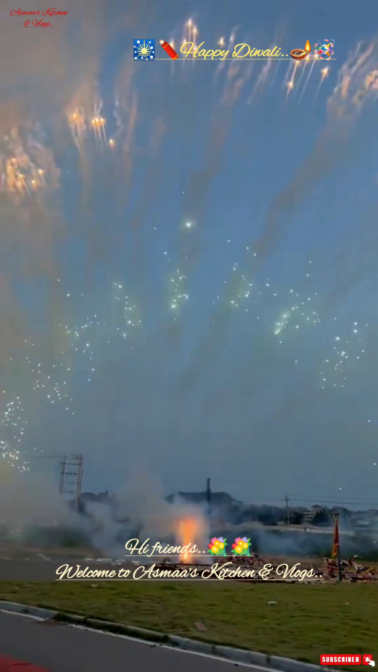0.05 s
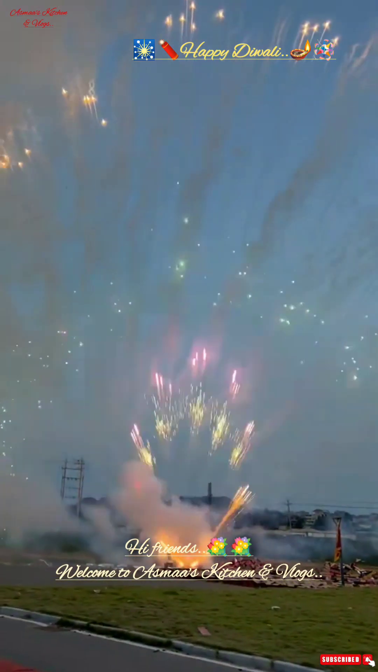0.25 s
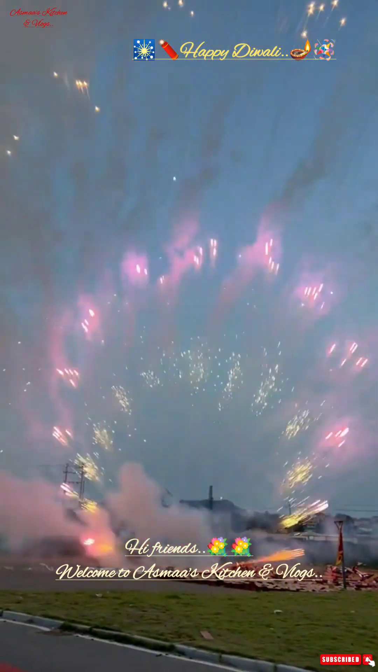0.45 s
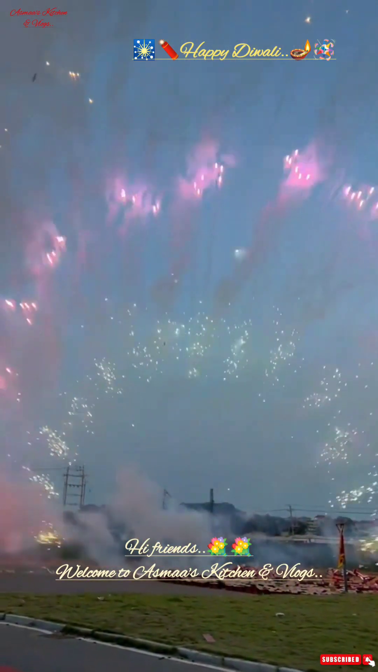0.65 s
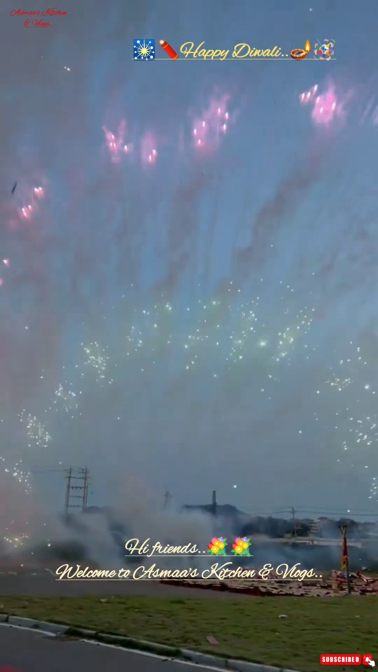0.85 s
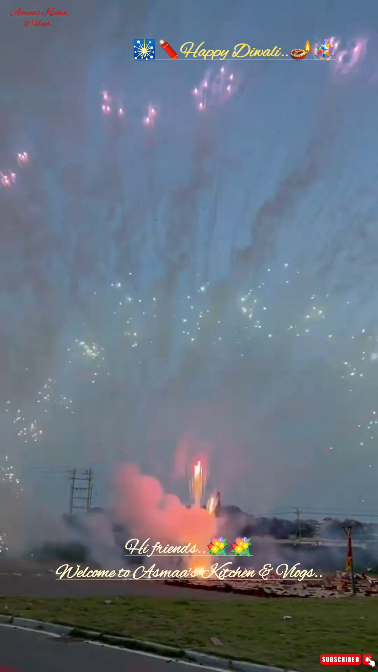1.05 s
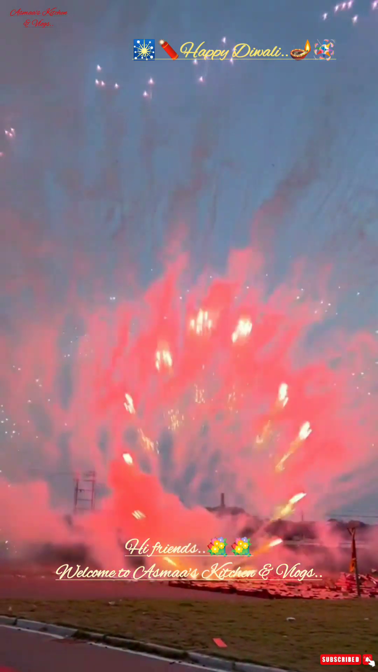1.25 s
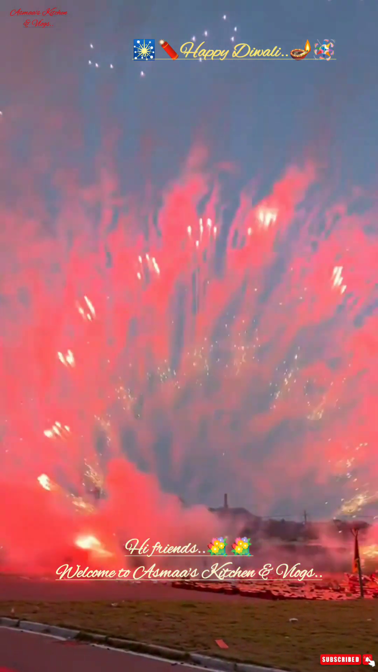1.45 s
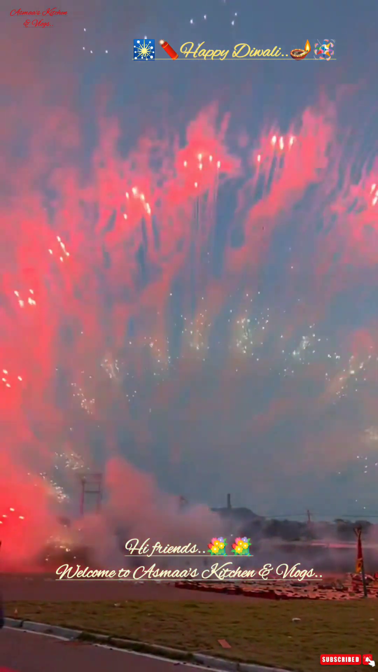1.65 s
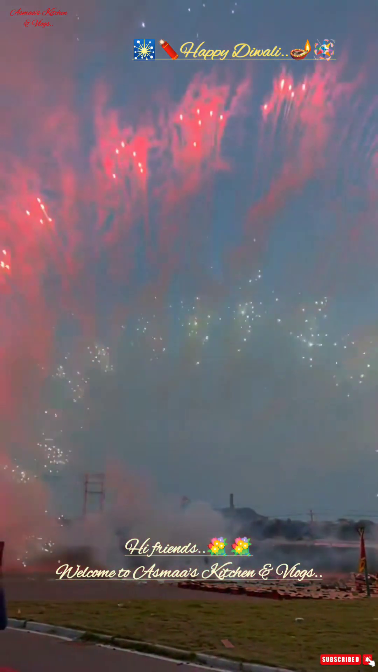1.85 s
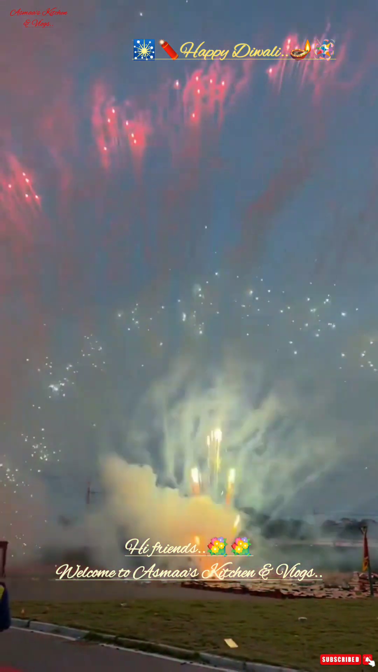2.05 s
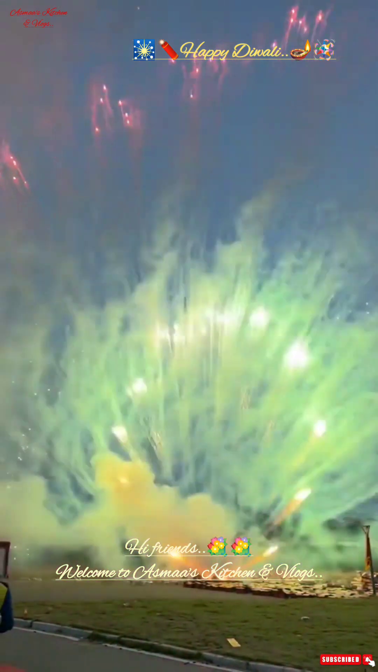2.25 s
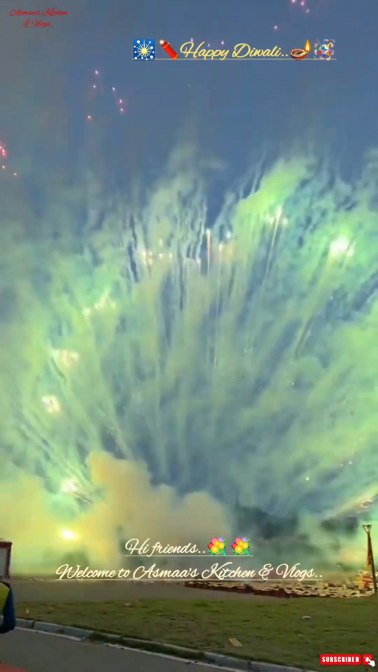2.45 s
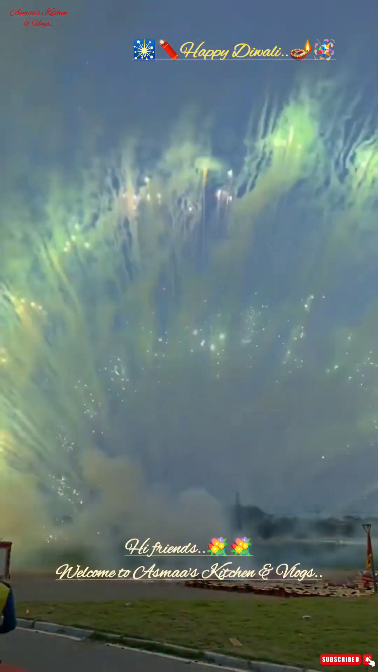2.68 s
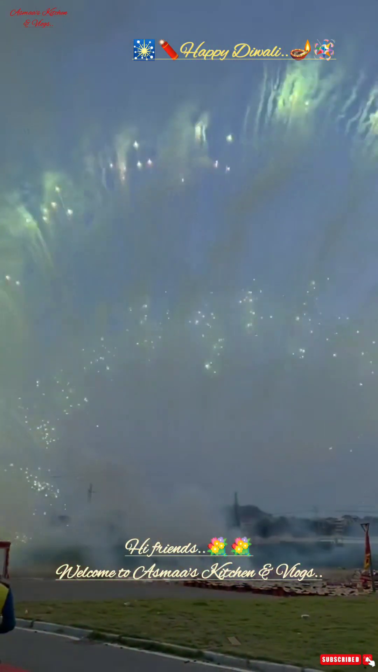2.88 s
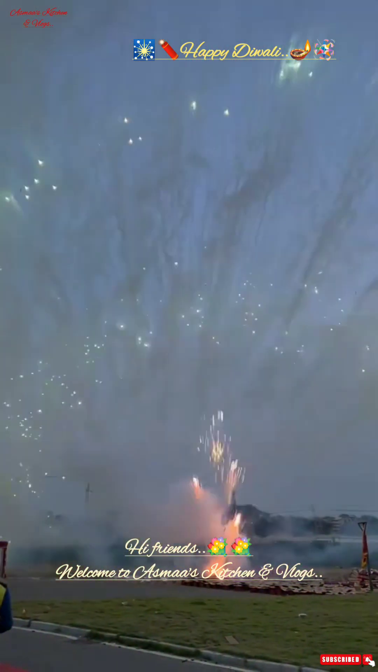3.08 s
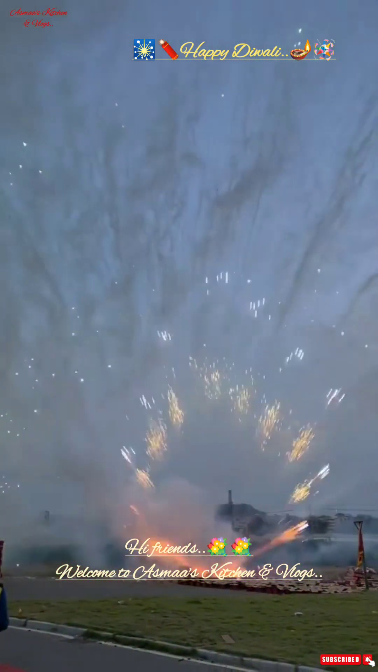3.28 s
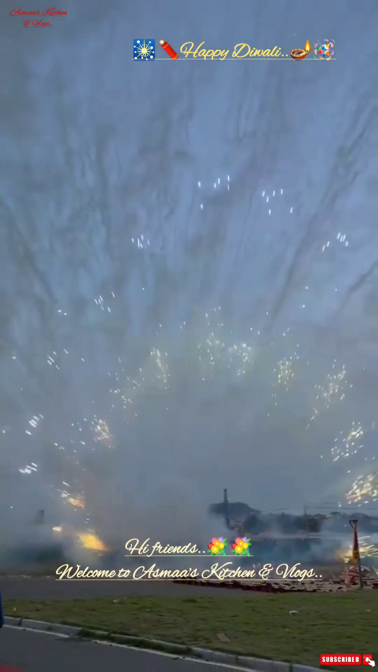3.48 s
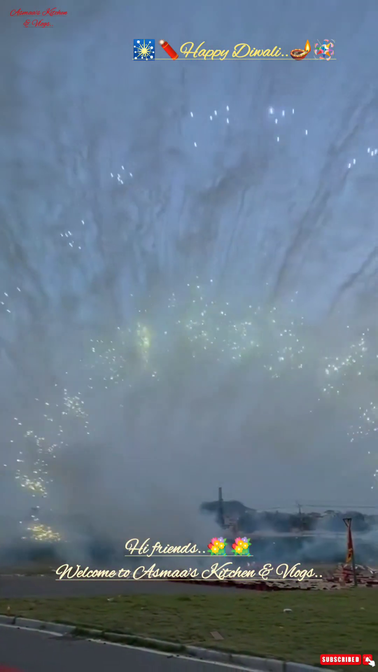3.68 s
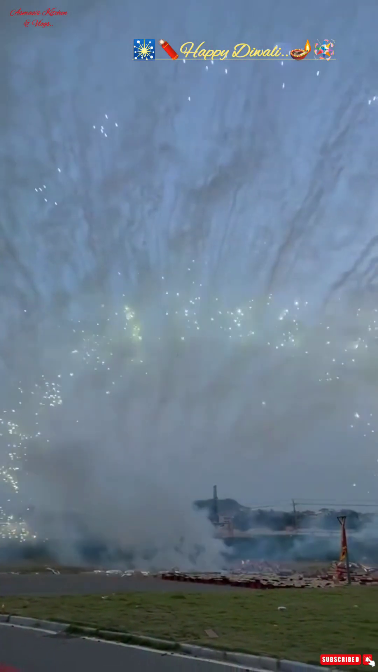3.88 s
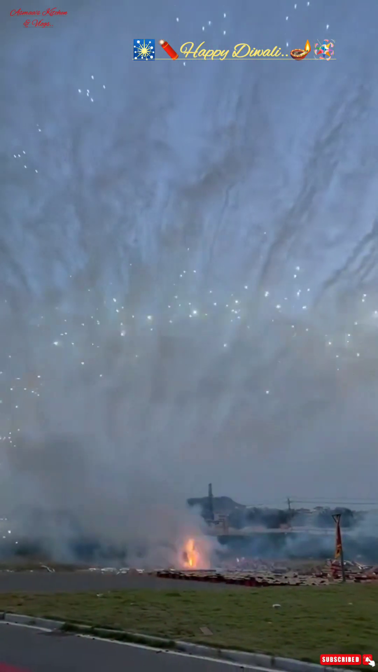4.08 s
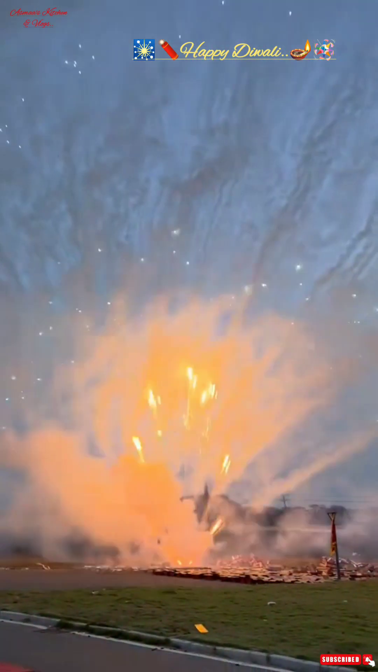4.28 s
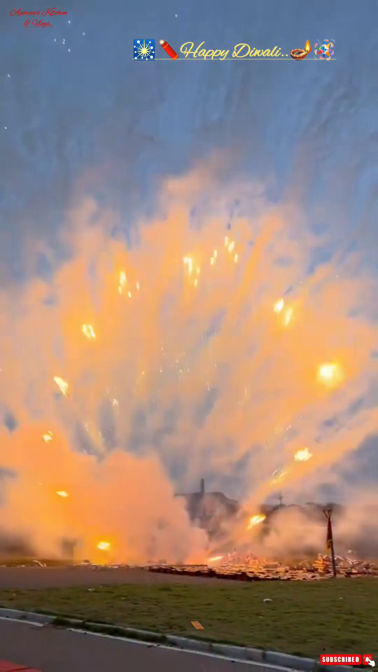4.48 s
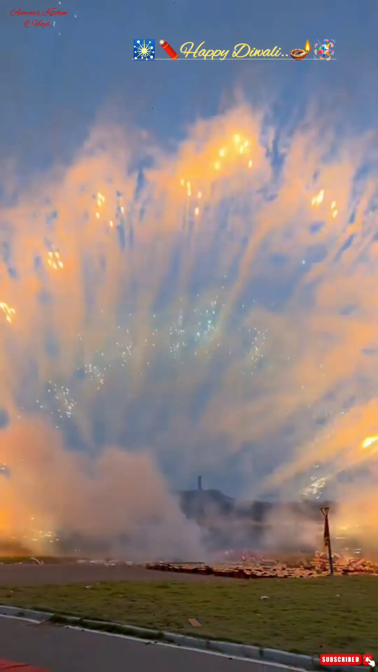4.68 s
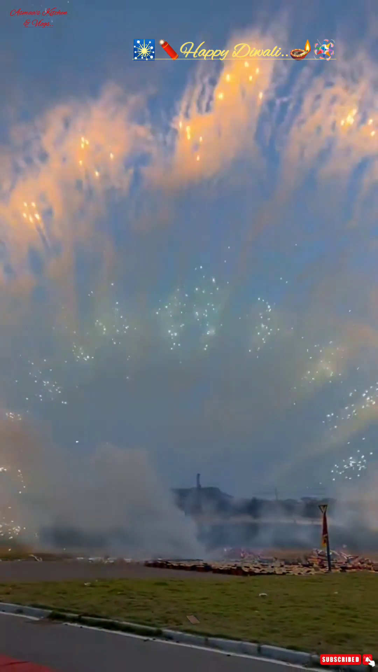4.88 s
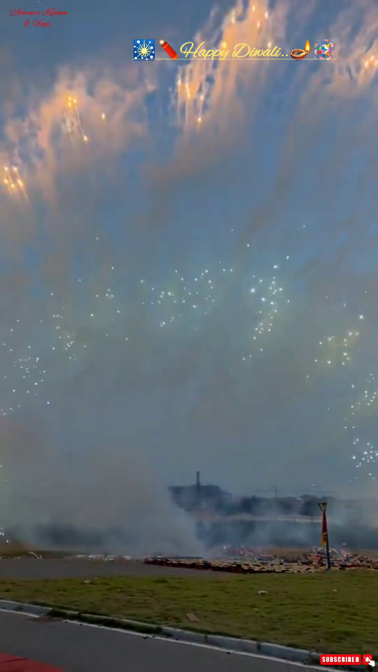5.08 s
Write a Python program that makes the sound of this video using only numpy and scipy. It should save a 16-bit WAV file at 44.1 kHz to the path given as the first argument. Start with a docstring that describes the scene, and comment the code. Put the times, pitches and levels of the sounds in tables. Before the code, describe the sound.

Five rapid volleys of fireworks crack and thump about once a second over open ground, each trailing off in rumbling echoes.

```python
"""Volleys of firework tubes over open ground

A fan of firework tubes fires volleys about once a second, some way from a phone.
Each lift charge gives a sharp crack, a steep front within a noise burst, and just after it a low thump
that the ground draws out into a falling chirp. Dull mid-band knocks fall among them, and far buildings
send back a wash of decaying noise echoes and a rolling rumble of scattered thumps."""
import sys
import numpy as np
from scipy import signal
from scipy.fft import rfft, irfft
from scipy.io import wavfile
from scipy.ndimage import uniform_filter1d

SR = 44100
rng = np.random.default_rng(int(sys.argv[2]) if len(sys.argv) > 2 else 0)


def generate_wav(signal):
    """Clip the signal to [-1, 1] and save it as 16-bit WAV at the path in sys.argv[1]."""
    frames = np.transpose(np.atleast_2d(signal))
    scaled = np.clip(frames, -1, 1) * 32767
    pcm = np.round(scaled).astype(np.int16)
    wavfile.write(sys.argv[1], SR, pcm)


N = 226321  # length in samples


def undb(db):
    """Level to amplitude: 20 dB is a factor of ten."""
    return 10 ** (np.asarray(db) / 20)


def unit(x):
    """Normalisation to an RMS of one."""
    return x / np.sqrt(np.mean(x ** 2))


def colour(x, table):
    """Linear filtering: the spectrum is shaped by (f/Hz, level/dB) points joined over log frequency."""
    hz, db = np.transpose(table)
    f = np.maximum(np.fft.rfftfreq(x.shape[-1], 1 / SR), 1)
    gain = undb(np.interp(np.log(f), np.log(hz), db))
    return irfft(rfft(x) * gain, x.shape[-1])


def spikes(s, gain, lead_s=0):
    """Impulse train: one sample per event, on a line that starts lead_s early."""
    line = np.zeros(N + int(lead_s * SR))
    index = np.clip(((s + lead_s) * SR).astype(int), 0, len(line) - 1)
    np.add.at(line, index, gain)
    return line


# every shot with a crack: (t/s, crack peak/dB, treble lift/dB, thump gain/dB)
SHOTS = [(0.201, -4.5, 5, -7.5), (0.2389, -2.5, -6, -9), (0.2474, -4, 3, -13.5), (0.2944, -1, 7.5, -3.5),
         (0.3468, -9, 4, -20), (0.354, 0.1, 1.5, -5), (0.4041, -4.5, 8, -12), (0.452, -19, -.6, -21),
         (0.4593, -14.5, 5, -14), (0.4851, -6, 6, -8), (0.5193, -15, 9.5, -33), (0.542, -8, 13, -10.5),
         (0.6025, -19, 9.5, -28), (0.6573, -24, 2.5, -34), (0.748, -29, 4, -40), (1.1402, -4, -0.5, -8.5),
         (1.1753, -3.5, 15, -28), (1.1789, -0.2, 2, -8), (1.1867, -5.5, 8, -15), (1.2323, -2.5, 15, -11.5),
         (1.2435, -3.5, -1, -9), (1.268, -3, 7, -9), (1.301, -6.5, 4.5, -10), (1.3094, -3, 7.5, -11),
         (1.3312, -19, 2.5, -30), (1.3456, -9, 1, -12), (1.3535, -8, 3, -16), (1.3831, -20, -1, -15),
         (1.3925, -5.5, 7.5, -7.5), (1.403, -11, .6, -12.5), (2.055, -26.5, 4.5, -35),
         (2.0826, -4.5, 1.5, -12), (2.1458, -2.5, 12, -11.5), (2.1482, -1.5, 5.5, -27),
         (2.1845, -2.5, 9.5, -9), (2.197, -4, 0, -7.5), (2.2367, -1.5, 8.5, -12.5), (2.2676, -3, 2, -8),
         (2.2916, -12, -3, -10.5), (2.3, -12, 3.5, -32), (2.3243, -1, 7, -9), (2.366, -16, 7.5, -15),
         (2.378, -9, 8, -7), (2.3841, -16, 5.5, -10.5), (2.4367, -15, 7.5, -8.5), (2.4671, -18.5, 8, -17),
         (3.123, -0.7, 6.5, -9.5), (3.1753, -1, 4, -8.5), (3.1866, -3.5, 2, -8), (3.2188, -1, 6, -7.5),
         (3.2685, -1.5, 9, -7), (3.2744, -5, -.6, -6.5), (3.3215, -12.5, 2, -9), (3.3267, -3, 9.5, -5),
         (3.372, -3.5, 6.5, -6), (3.4125, -13, .6, -9.5), (3.425, -14.5, .6, -17), (3.441, -18, 1, -34),
         (3.4479, -7, 9, -11.5), (4.125, -41, 5, -42), (4.2245, -23.5, -1, -30), (4.254, -3, 5.5, -7),
         (4.267, -16, 11, -31), (4.295, -6, 5, -9), (4.31, -2, 8.5, -7), (4.3226, -11, 4.5, -24),
         (4.3329, -5, 3, -14), (4.3746, 0.7, 4, -6.5), (4.405, -3, -5, -7), (4.4282, -0.5, 6.5, -6),
         (4.4546, -6, 3.5, -11), (4.4912, -19.5, -4, -22), (4.5115, -1.5, 0.5, -6.5),
         (4.5233, -8.5, -3, -10), (4.573, -7, 3, -5), (4.626, -26, -3.5, -30), (4.645, -7.5, 10.5, -8.5)]
# spectral colour of a crack: (f/Hz, level/dB)
CRACK_COLOUR = [(200, -55), (760, -8), (1400, -3), (2400, 2.5), (4500, -1.5), (7000, -6.5), (10000, -12.5),
                (15000, -30), (17000, -52)]
BURST_DB, BURST_RISE_S, BURST_FALL_S = -8, 0.0021, 0.0032
TREBLE_HZ = 5960  # the lift runs from half of this to 2.2 times it
WALL_S, WALL_DB = 0.013, -15.5


def cracks():
    """Impulsive sound: a sharp front in a short noise burst that rises before it and falls after."""
    size, before = 2048, 512  # samples in one crack, and those ahead of its front
    out = np.zeros(N + size)
    t = (np.arange(size) - before) / SR
    # the slope of a narrow bell: a positive swing, then a negative one
    front = np.gradient(np.exp(-.5 * (t * SR / 1.5) ** 2))
    front = colour(front / np.abs(front).max(), [(100, 35), (4000, -2), (16000, 6)])
    rise = np.exp(np.minimum(t, 0) / BURST_RISE_S)
    fall = np.exp(-np.maximum(t, 0) / BURST_FALL_S)
    envelope = np.where(t < 0, rise, fall)
    for s, peak_db, lift_db, _ in SHOTS:
        burst = rng.standard_normal(size) * envelope * undb(BURST_DB)
        tilt = [(TREBLE_HZ / 2, 0), (TREBLE_HZ * 2.2, lift_db)]
        crack = colour(colour(front + burst, CRACK_COLOUR), tilt)
        i = int(s * SR) - before
        out[i:i + size] += crack * undb(peak_db) / np.abs(crack).max()
    # a nearby wall repeats every crack
    return out[:N] + undb(WALL_DB) * np.roll(out, int(WALL_S * SR))[:N]


# low booms without a crack, late in the volleys: (t/s, gain/dB)
BOOMS = [(0.4079, -10.1), (0.6102, -21), (0.6427, -24), (1.3366, -11), (1.441, -14), (1.4691, -15),
         (2.364, -12), (2.455, -11), (3.433, -17), (3.478, -9), (3.487, -15), (3.5085, -14.5),
         (4.5002, -16.5), (4.5799, -10), (4.609, -20), (4.6161, -10.5), (4.636, -13.5), (4.7419, -19),
         (4.8312, -24), (1.55, -19), (2.53, -24), (2.801, -24)]


def lows():
    """Source list: times and gains of every thump and boom."""
    s, db = np.transpose([(shot[0], shot[3]) for shot in SHOTS] + BOOMS)
    return s, undb(db)


THUMP_PEAK_S = 0.01097
# in natural-log time: length of a half wave, centre and spread of the envelope
THUMP_STRETCH, THUMP_CENTRE, THUMP_SPREAD = 0.34, 0.088, 0.44


def thump(slower=1):
    """Dispersion: low tones creep along the ground more slowly, so each half wave outlasts the one before."""
    log_time = np.log(np.arange(1, 4000) / SR / (THUMP_PEAK_S * slower))
    chirp = np.cos(np.pi * log_time / THUMP_STRETCH)
    return chirp * np.exp(-.5 * ((log_time - THUMP_CENTRE) / THUMP_SPREAD) ** 2)


def thumps():
    """Superposition: the pressure waves of all lift charges add."""
    return signal.fftconvolve(spikes(*lows()), thump())[:N]


# dull mid-band knocks: (t/s, peak/dB, centre f/Hz)
KNOCKS = [(0.167, -33.5, 1676), (0.318, -18, 1110), (0.456, -19, 1792), (0.469, -17, 1730),
          (0.519, -25, 1610), (0.582, -21.5, 1675), (0.642, -20, 1072), (0.659, -25, 870),
          (0.749, -30, 1580), (1.367, -18, 1994), (1.384, -14.5, 1830), (1.469, -24, 805),
          (1.508, -21, 1228), (2.249, -18, 1720), (2.285, -18, 1700), (2.293, -21, 2340),
          (2.436, -22.5, 1277), (2.551, -25, 915), (2.573, -27, 887), (3.11, -35, 1639), (3.238, -32, 1010),
          (3.291, -19.5, 1260), (3.55, -23, 775), (3.682, -30, 1160), (4.324, -40, 1900),
          (4.529, -14.5, 1337), (4.648, -17.5, 690), (4.743, -21, 1110), (4.758, -27, 2020)]
KNOCK_S = 0.0035  # rise and fall time constant of the noise before its band filter


def knocks():
    """Band-limited transients: short noise bursts, each filtered to a band of its own."""
    before, after = 500, 1000  # samples
    out = np.zeros(N)
    t = np.arange(-before, after) / SR
    for s, db, hz in KNOCKS:
        band = signal.butter(2, [hz / 1.5, hz * 1.5], "bandpass", fs=SR, output="sos")
        burst = signal.sosfilt(band, rng.standard_normal(len(t)) * np.exp(-np.abs(t) / KNOCK_S))
        i = int(s * SR)
        out[i - before:i + after] += burst / np.abs(burst).max() * undb(db)
    return out


EARLIER_S = .94


def with_earlier(s, gain):
    """Residual reverberation: a like volley just before the first joins an event line from 1 s early."""
    first = s < EARLIER_S
    return spikes(s, gain, 1) + spikes(s[first] - EARLIER_S, gain[first], 1)


def lumps(hold):
    """Random modulation: levels drawn every hold samples, joined by slopes, with a spread near 1."""
    steps = np.repeat(rng.standard_normal(N // hold + 1), hold)[:N]
    return 1.2 * uniform_filter1d(steps, hold)


# echo wash by band, before the swell and the loss in air:
# (centre f/Hz, near level/dB, near decay by 60 dB t/s, far level/dB, far decay by 60 dB t/s)
WASH = [(252, -27, 0.83, -51, 2.47), (594, -33.5, 0.95, -50.5, 2.56), (1104, -35, 0.83, -58.5, 2.55),
        (2033, -29.5, 0.62, -48.5, 2.16), (4950, -33.5, 0.6, -55.5, 2), (7600, -38, 0.58, -64.5, 2.6),
        (10800, -48, .5, -70, 2.1)]
# the air takes the top off every echo of the wash: (f/Hz, level/dB)
AIR = [(9500, -0.5), (10800, -5.5), (12200, -9.5), (16000, -9)]
WASH_RISE_S, WASH_LUMP_DB = 0.085, 3.0
WIDEN_S, SIDE_DB = 0.19, -13.5


def wash():
    """Diffuse reverberation: every shot returns as many small echoes that swell, then decay by band."""
    s, crack_db = np.transpose(SHOTS)[:2]
    shots = with_earlier(s, undb(crack_db)) + with_earlier(*lows())
    t = np.arange(2 * SR) / SR
    rise = 1 - np.exp(-t / WASH_RISE_S)
    # the stereo image is narrow at first and widens in the tails
    wide = undb(SIDE_DB) / (1 + np.exp(-(t - WIDEN_S) / 0.0088))
    clumped, smooth_response, side_response = 0, 0, 0
    shared = lumps(200)  # common to all bands
    for hz, db, t60, far_db, far_t60 in WASH:
        edges = [hz / 1.45, min(hz * 1.45, SR / 2.1)]
        band = signal.butter(2, edges, "bandpass", fs=SR, output="sos")
        near, far, aside = (unit(signal.sosfilt(band, rng.standard_normal(len(t)))) * rise
                            for _ in range(3))
        near_fade = undb(db - 60 * t / t60)
        far_fade = undb(far_db - 60 * t / far_t60)
        # near echoes arrive in clumps, far ones blur into an even fade
        clumps = undb(WASH_LUMP_DB * (.45 * shared + .9 * lumps(350)))
        clumped = clumped + signal.fftconvolve(shots, near * near_fade)[SR:SR + N] * unit(clumps)
        smooth_response = smooth_response + far * far_fade
        side_response = side_response + aside * (near_fade + far_fade) * wide
    mid = signal.fftconvolve(shots, smooth_response)[SR:SR + N]
    side = signal.fftconvolve(shots, side_response)[SR:SR + N]
    # the side signal enters the two channels with opposite signs
    return colour(clumped + mid + side * np.array([[1], [-1]]), AIR)


# colour of the rumble, dulled by its long path: (f/Hz, level/dB)
RUMBLE_COLOUR = [(32, -10), (48, -9.5), (62, 0), (110, 0.5), (170, -1), (210, -3), (320, -12)]
# the lingering roll has come furthest and keeps only a narrow low band: (f/Hz, level/dB)
FAR_ROLL = [(45, -3), (70, -0.5), (150, -0.5), (210, -6)]
RUMBLE_RATE = 300  # scattered thumps per second
# swell time constant, then starting level and time to fall 60 dB for the quick and lingering parts
ROLL_RISE_S, ROLL_DB, ROLL_T60_S, ROLL_FAR_DB, ROLL_FAR_T60_S = 0.037, -18, 1.01, -28.5, 7.5


def rumble():
    """Multiple scattering: thumps return at random, their length set by the path, and swell and die away."""
    place, strength, kind = rng.random((int(RUMBLE_RATE * N / SR), 3)).T
    gains = undb(-1.5 * np.log(1 - strength))
    roll = 0
    for k, slower in enumerate((.7, 1.0, 1.45)):
        pick = (kind * 3).astype(int) == k
        line = spikes(place[pick] * N / SR, gains[pick])
        roll = roll + signal.fftconvolve(line, thump(slower))[:N]
    roll = colour(roll, RUMBLE_COLOUR)
    # the roll keeps an even strength over a tenth of a second
    power = uniform_filter1d(uniform_filter1d(roll ** 2, SR // 10), SR // 10)
    roll = roll / np.sqrt(power)
    # each thump feeds power to the roll, which dies quickly at first and then lingers
    s, gain = lows()
    feed = with_earlier(s, gain ** 2)
    t = np.arange(2 * SR) / SR
    swell = 1 - np.exp(-t / ROLL_RISE_S)
    near_fade = undb(ROLL_DB - 60 * t / ROLL_T60_S) ** 2 * swell
    far_fade = undb(ROLL_FAR_DB - 60 * t / ROLL_FAR_T60_S) ** 2 * swell
    near, far = (np.sqrt(np.abs(signal.fftconvolve(feed, fade)[SR:SR + N]))
                 for fade in (near_fade, far_fade))
    return roll * near + colour(roll, FAR_ROLL) * far


def scene():
    """Superposition: shots and knocks over the wash and the rumble."""
    return cracks() + thumps() + knocks() + wash() + rumble()


TOP_HZ = 15900


def record(dry):
    """Band limiting and saturation: the phone drops deep bass, rounds the loudest peaks and cuts the top."""
    x = signal.sosfiltfilt(signal.butter(2, 33, "highpass", fs=SR, output="sos"), dry)
    x = np.tanh(0.75 * x) / 0.79
    # below 480 Hz the sound is mono; only higher tones differ between the channels
    side_filter = signal.butter(8, 480, "highpass", fs=SR, output="sos")
    side = signal.sosfilt(side_filter, (x[0] - x[1]) / 2)
    x = x.mean(axis=0) + side * np.array([[1], [-1]])
    return signal.sosfilt(signal.ellip(8, .2, 70, TOP_HZ, fs=SR, output="sos"), x)


dry = scene()
out = record(dry)
generate_wav(out)
```